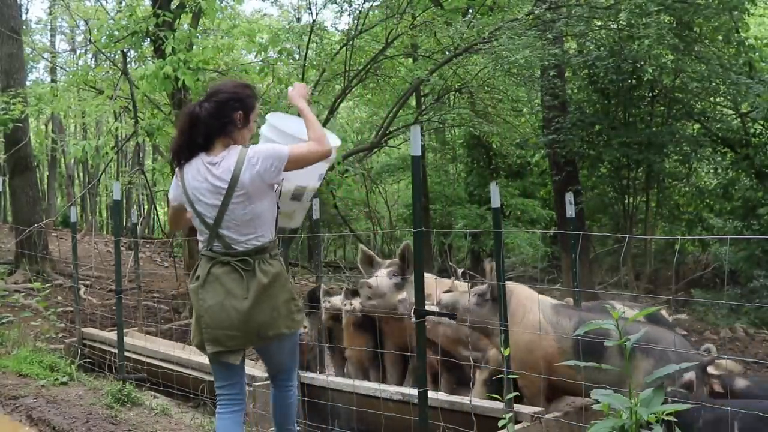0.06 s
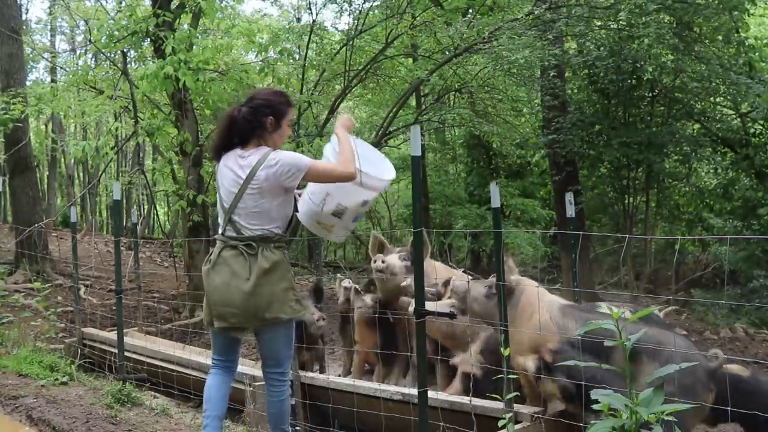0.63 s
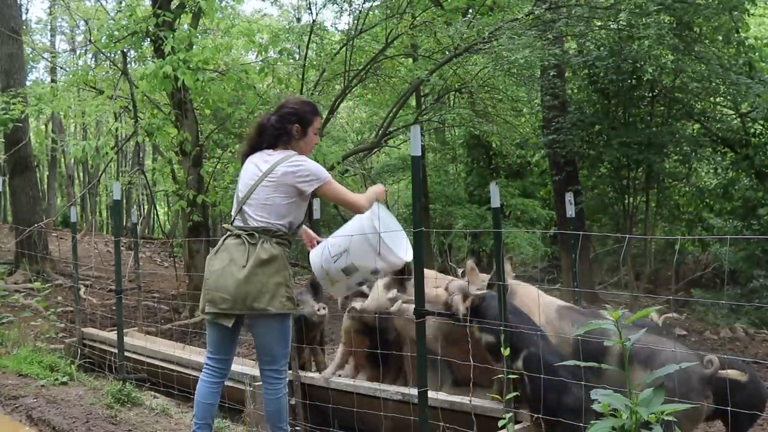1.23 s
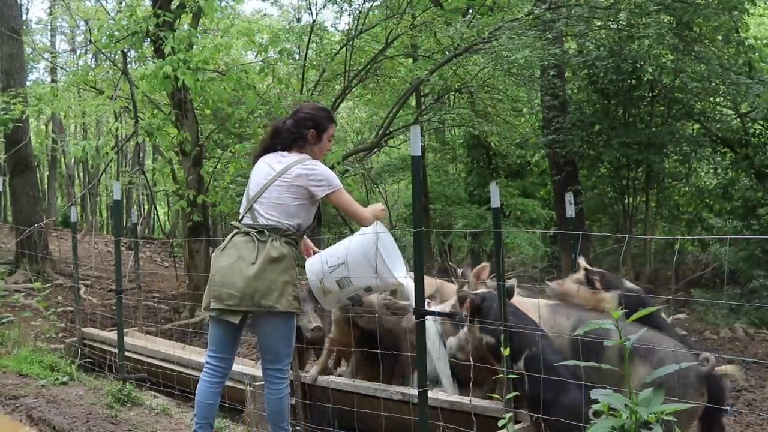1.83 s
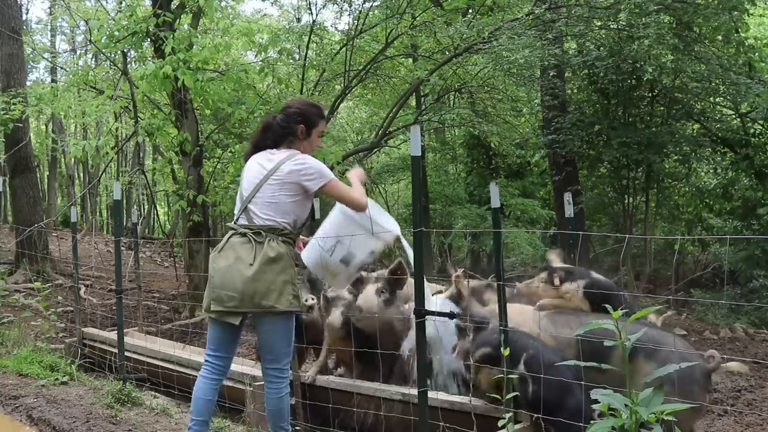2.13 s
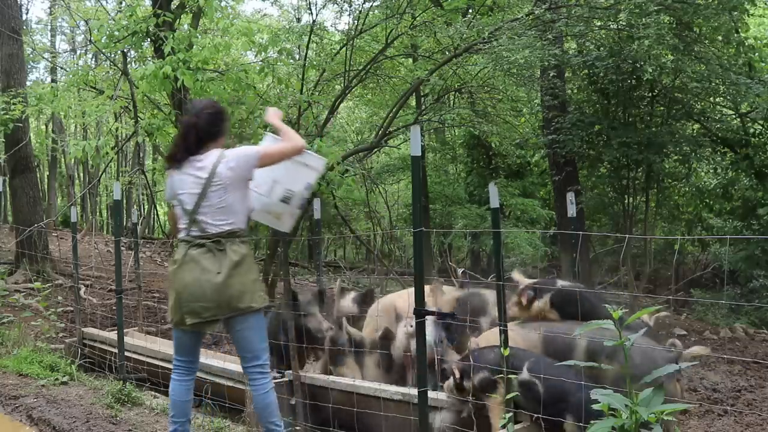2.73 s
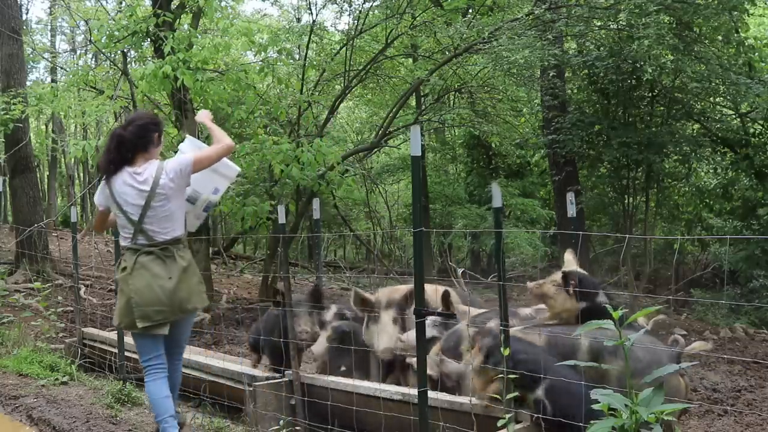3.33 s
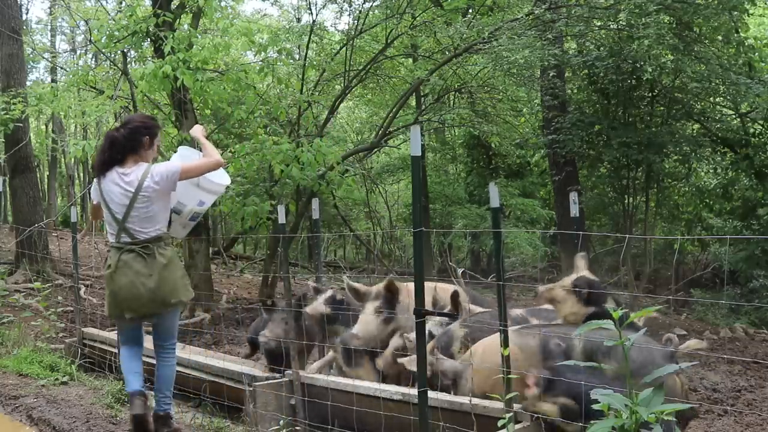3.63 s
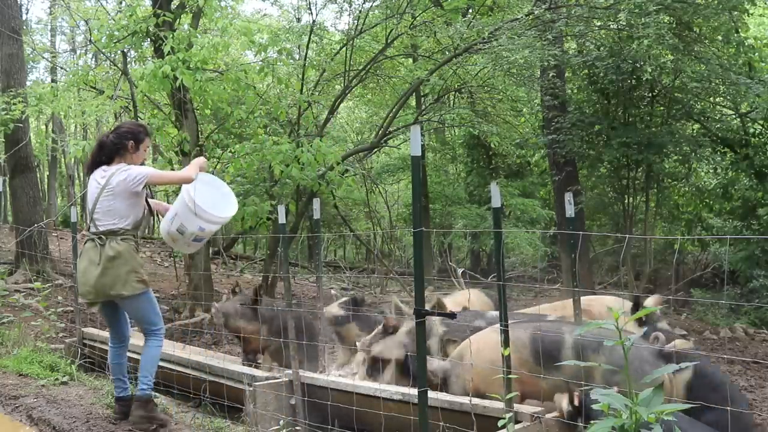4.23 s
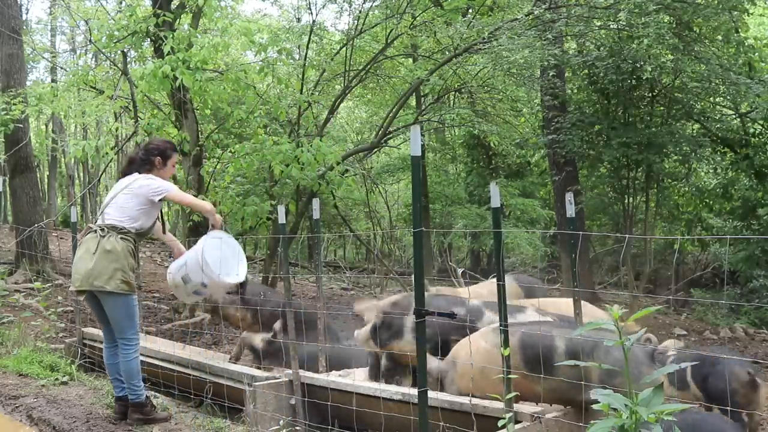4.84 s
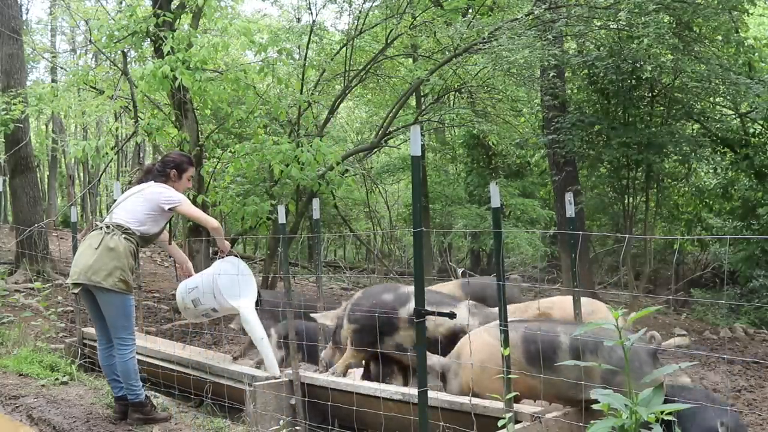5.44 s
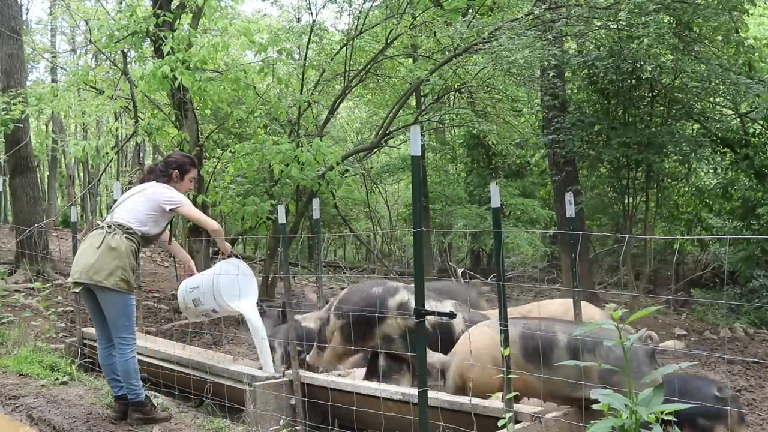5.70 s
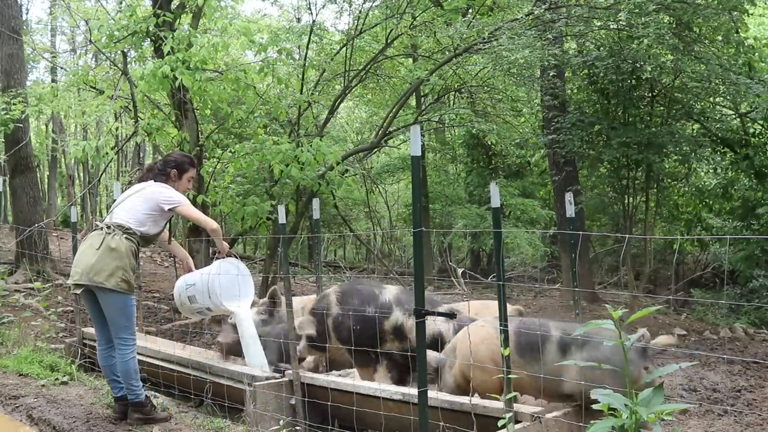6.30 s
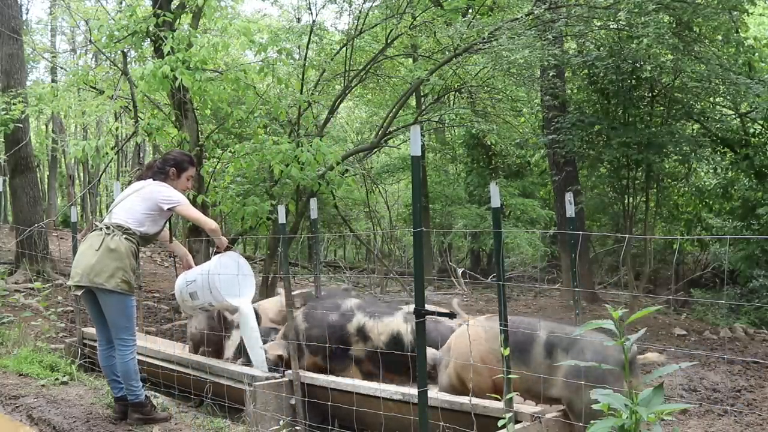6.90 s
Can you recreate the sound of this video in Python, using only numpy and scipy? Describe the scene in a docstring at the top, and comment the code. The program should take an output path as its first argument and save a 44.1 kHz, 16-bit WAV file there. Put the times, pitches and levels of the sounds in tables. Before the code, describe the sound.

Several pigs give short, rattling grunts a few metres from the microphone at the edge of a wood. Snouts and hooves thud on a wooden trough and wet mouths smack. About three seconds in, one pig lets out three quick, shrill squeals, followed by a single bark. Behind them, liquid feed splashes into the trough in spells over the low shuffle of the herd. The loudest knock comes near the end.

```python
"""Pigs grunting at a wooden feed trough, a few metres from one microphone at the edge of a wood.
Each grunt is a rattle of throat flaps over a chest growl; one pig squeals from its larynx, one barks.
Snouts and hooves thud on the boards, wet mouths smack, and the trees return a thin tail.
Behind them liquid feed splashes into the trough in spells, over the trampling of the herd."""
import sys
import numpy as np
from scipy import signal
from scipy.io import wavfile

SR = 44100
rng = np.random.default_rng(int(sys.argv[2]) if len(sys.argv) > 2 else 0)


def unload_audio(sound):
    """Save the sound as a 16-bit wav file, at the path given as the first command line argument."""
    columns = np.transpose(np.atleast_2d(sound))
    # keep every value between -1 and 1, then stretch to whole-number steps
    steps = np.round(np.clip(columns, -1, 1) * 32767)
    wavfile.write(sys.argv[1], SR, steps.astype(np.int16))


N = 311346

# grunts, plus one brief rasping chirp at 2.005 s made the same way: t/s, length/s, flap rate/Hz, rattle
# level/dB, chest level/dB, throat
GRUNTS = [ (0.376, 0.091, 61.4, -32, -28, "deep"), (0.765, 0.05, 72, -36.5, -41, "hoarse"),
          (0.9712, 0.094, 62.4, -29, -27.5, "rattling"), (1.5135, 0.084, 63.4, -28, -38.5, "hollow"),
          (2.005, 0.045, 82, -29.5, -52, "hoarse"), (2.632, 0.11, 58, -30.5, -31, "rattling"),
          (2.728, 0.062, 84, -29.5, -33, "hoarse"), (2.962, 0.051, 76, -30.5, -42, "hoarse"),
          (3.008, 0.029, 127, -25.5, -39, "hoarse"), (4.081, 0.119, 45.2, -24.5, -31.5, "nasal"),
          (4.630, 0.11, 79.7, -29, -24, "deep"), (4.969, 0.075, 44, -29, -32.5, "nasal"),
          (6.066, 0.034, 53, -22.5, -41, "shrill"), (6.324, 0.14, 45, -32.5, -30, "deep"), ]
# resonances of each throat: f/Hz, width/Hz, gain/dB
THROAT_MODES = { "rattling": [(593, 48, 7.5), (1530, 143, 6), (2820, 230, 3.5), (3820, 480, -9),
                (4520, 130, -5), (5440, 120, 7.5)], "deep": [(363, 120, -2.5), (695, 200, 2.5),
                (1516, 170, 4.5), (2700, 640, -5.5), (3640, 410, -5), (5500, 1200, -15)],
                "nasal": [(540, 130, -7), (1230, 160, 0.5), (1423, 68, 8.5), (2250, 140, -4),
                (4600, 750, -26)], "hollow": [(327, 29, 13), (736, 127, 4), (1890, 100, 1),
                (3100, 360, -10), (6000, 650, -17.5)], "shrill": [(1400, 64, -2.5), (1747, 73, 0.5),
                (3070, 94, 3), (3770, 300, -11.5), (5070, 280, -12)], "hoarse": [(320, 95, 4),
                (840, 140, 1.5), (1410, 220, -3), (2003, 154, 4), (3480, 280, 0.5), (5750, 620, -9.5)], }
# use of each throat: breathiness, treble tilt at normal effort/(dB per decade), crest/share of length
THROAT_MANNERS = {"rattling": (0.2, 4.8, 0.12), "deep": (0.42, 3.7, .05), "nasal": (0.14, -8, 0.56),
                  "hollow": (0.31, -1, 0.62), "shrill": (.8, -13, 0.19), "hoarse": (1, 3, 0.46)}
# chest resonances: f/Hz, width/Hz, gain/dB
CHEST_MODES = [(105, 66, -1.5), (195, 104, -0.5), (275, 106, -1), (414, 89, -14.5), (584, 42, -12)]
# cries of the squeal: t/s, length/s, attack/s, level/dB, first f/Hz, last f/Hz, last roughness (0-1)
CRIES = [(3.094, 0.0705, 0.03, -15, 2764, 2560, 0.27), (3.192, .097, 0.039, -15.5, 2240, 1990, 0.4),
         (3.289, .049, 0.004, -18, 2500, 1770, 0.6)]
# rasp bands that glide with the whistle: multiple of its pitch, width/Hz, gain/dB
SQUEAL_BANDS = [(.8, 260, -3), (1.0, 380, 2), (1.18, 378, -2), (2.22, 418, -12.5)]
# resonances of the squealing mouth: f/Hz, width/Hz, relative gain/dB
SQUEAL_MOUTH = [(5200, 180, -10.5), (5830, 220, -10.5), (6470, 200, -12.5), (8000, 370, -28),
                (10300, 590, -26), (13900, 1400, -32)]
# resonances of the barking throat: f/Hz, width/Hz, gain/dB
BARK_THROAT = [(583, 210, 2), (1100, 175, 8), (1650, 320, 3), (2340, 360, 0), (3040, 1450, -9.5)]
# blows on the trough: t/s, peak level/dB, main ring f/Hz, low-pass f/Hz
THUDS = [(0.261, -22, 170, 1200), (0.812, -14.5, 292, 910), (0.947, -21.5, 193, 400),
         (1.175, -21.5, 270, 400), (2.238, -12.5, 272, 620), (2.337, -12, 320, 1030),
         (2.468, -14.5, 340, 560), (2.517, -13, 255, 500), (2.779, -4.5, 425, 597), (2.800, -15, 446, 500),
         (3.083, -9, 340, 700), (3.256, -9.5, 263, 524), (3.559, -16, 378, 910), (3.726, -15, 338, 500),
         (4.263, -17, 370, 900), (4.287, -15, 205, 420), (5.153, -13, 187, 380), (5.318, -13.5, 310, 1290),
         (5.884, -15.5, 221, 400), (6.167, -11, 216, 363), (6.6955, -5, 224, 507), (6.8222, -2, 399, 2900)]
# modes of the boards: multiple of the main ring, gain/dB
BOARD_MODES = [(.62, -2), (1.0, 3), (1.45, -6.5), (2.1, -8), (3.1, -11), (4.2, -17)]
# smacks of mouths and mud: t/s, peak level/dB, f/Hz, nominal width/Hz
SMACKS = [(0.260, -20.5, 1130, 217), (0.320, -23, 2040, 300), (0.622, -17.5, 3900, 4500),
          (1.144, -25, 1100, 300), (1.779, -13.5, 3060, 694), (2.485, -25.5, 7800, 6030),
          (2.512, -18.5, 3220, 2500), (3.559, -15, 2470, 4830), (4.451, -21, 5400, 6000),
          (4.513, -22.5, 2800, 2980), (4.644, -24.5, 7900, 6000), (4.862, -25, 2200, 4000),
          (5.714, -13, 2040, 1210), (5.763, -18.5, 1290, 350), (6.892, -15, 4870, 2200)]
# feed poured in or churned by snouts: start t/s, end t/s, relative level/dB
SPLASHES = [(.3, .74, -40), (1.67, 2.29, -34.5), (2.41, 2.684, -38), (3.242, 3.518, -35.5),
            (5.16, 5.733, -35.5), (5.8, 7.06, -36)]
# spectrum of sloshing feed: f/Hz, relative level/dB
SLOP_SPECTRUM = [(450, -3), (800, 1.5), (1250, 9.5), (2000, -2), (2900, -5)]
# spectrum of its fine spray: f/Hz, relative level/dB
SPRAY_SPECTRUM = [(1700, -4.5), (2700, 3), (3600, 1), (4700, 0), (5900, 0.5), (7400, -10), (10500, -10),
                  (15500, -15)]
# hollow ring of the trough under the feed: f/Hz, width/Hz, relative gain/dB
TROUGH_MODES = [(1420, 210, -12), (2450, 230, -9), (3730, 330, 3)]
# low background (herd shuffle, plus the squeal's low hum near 3.15 s): t/s, relative level/dB
BACKGROUND_LEVEL = [(0.0, -42), (0.33, -40.5), (0.75, -46), (1.0, -40.5), (1.38, -45), (2.08, -47),
                    (2.28, -37.5), (3.03, -42.5), (3.15, -33), (3.56, -37.5), (4.13, -32.5), (4.44, -37.5),
                    (4.88, -36.5), (5.21, -42.5), (5.64, -42.5), (6.29, -34), (6.57, -37.5), (7.06, -30.5)]
# spectrum of far grunts and trampling: f/Hz, relative level/dB
HERD_SPECTRUM = [(25, -19), (45, -12.5), (80, -8.5), (130, -1.5), (300, 2), (480, -7), (750, -9.5),
                 (1200, -19)]

NORMAL_EFFORT_DB, TILT_PER_DB = -29, 1.4   # louder is brighter: dB per decade for each dB of rattle
SQUEAL_PULSE_HZ, CRY_FIRST_ROUGHNESS = 380, 0.88
RASP_LOSS_DB = 9.5   # a full rasp against a clean whistle
BARK_START_S, BARK_DB, BARK_PITCH_HZ, BARK_SAG_HZ_PER_S = 3.9415, -12.5, 580.6, 2200
MUD_DB, MUD_FOLLOWS = -26.5, 0.35   # mud underfoot takes this share of the background's swing in dB
TREES_T60_S, TREES_DB = 0.3, -21


def grunt(length, flap_hz, rattle_db, chest_db, throat):
    """The throat flaps open in wet puffs; under it the folds growl at about twice that rate, sinking."""
    breath, tilt, crest = THROAT_MANNERS[throat]
    tilt = tilt + TILT_PER_DB * (rattle_db - NORMAL_EFFORT_DB)
    t = clock(length * 1.14 + 0.024)
    progress = t / length
    flaps = pulses(flap_hz * (1 + .01 * drift(60, t)))
    air = noise(t) * (puffs(flaps, seconds=.0022) + breath * .5) + 6 * flaps
    air = air * swell(progress, crest, edge=0.58) ** 2
    modes = [(hz, width, db + tilt * np.log10(hz / 1000)) for hz, width, db in THROAT_MODES[throat]]
    rattle = cut(resonate(air, modes), 11400, "low")
    slack = np.clip((progress - .4) * 2, 0, 1)   # as the pressure drops the flaps lose their edge
    rattle = (1 - slack) * rattle + slack * cut(rattle, 5400, "low")
    beats = pulses(2 * flap_hz * (1.04 - 0.202 * progress + 0.037 * drift(95, t)))
    uneven = 1 + 0.77 * (-1) ** np.cumsum(beats) + 0.51 * drift(148, t)   # strong and weak in turn
    growl = (beats * uneven + .03 * noise(t)) * swell(progress, crest=.55, edge=.5)
    chest = cut(resonate(growl, CHEST_MODES), 72, "high", order=4)
    chest = cut(chest, 1000, "low")
    tail_makeup = np.sqrt(len(t) / (length * SR))
    return tail_makeup * (from_db(rattle_db) * rms_one(rattle) + from_db(chest_db) * rms_one(chest))


def squeal(length, attack, level_db, first_hz, last_hz, last_rough):
    """One cry from the larynx: a pulsed rasp sinks and clears towards a whistle; the mouth flutters."""
    t = clock(length + 0.043)
    progress = np.minimum(t / length, 1)
    hz = first_hz + (last_hz - first_hz) * progress
    rough = np.clip(CRY_FIRST_ROUGHNESS + (last_rough - CRY_FIRST_ROUGHNESS) * progress ** 2, 0, 1)
    phase = 2 * np.pi * np.cumsum(hz * (1 + .05 * rough * drift(600, t))) / SR
    beats = pulses(SQUEAL_PULSE_HZ * (1 + .035 * drift(150, t)))
    gate = puffs(beats, seconds=0.0019)
    air = beats * (1 + .35 * drift(300, t)) + .1 * noise(t) * (gate + .1)
    rasp = 0
    for multiple, width, db in SQUEAL_BANDS:
        carrier, r = np.exp(1j * multiple * phase), np.exp(-np.pi * width / SR)
        band = carrier * signal.lfilter([1], [1, -2 * r, r * r], air / carrier)   # rides on the pitch
        rasp = rasp + from_db(db) * (1 - r) ** 2 * band.real
    mouth = sum(resonate(air, [mode]) * from_db(3 * drift(70, t)) for mode in SQUEAL_MOUTH)
    rasp = cut(rasp, 1600, "high") + 0.43 * cut(mouth, 13000, "low")
    whistle = rms_one(np.sin(phase) * (1 + cut(gate, 1100, "low")))
    hum = from_db(-12) * rms_one(resonate(beats, [(SQUEAL_PULSE_HZ, 160, 0)]))
    clean = 1 - rough ** 2
    voice = np.sqrt(1 - clean ** 2) * rms_one(rasp) + clean * whistle + rough * hum
    effort = from_db(level_db - RASP_LOSS_DB * (rough - .5))
    return effort * envelope(t, attack, hold=length - attack, release=0.0083) * voice


def bark():
    """A few hard, high pulses through an open mouth."""
    t = clock(.06)
    hz = BARK_PITCH_HZ - BARK_SAG_HZ_PER_S * t
    air = pulses(hz * (1 + 0.024 * drift(400, t))) + 0.17 * noise(t)
    effort = from_db(BARK_DB) * envelope(t, attack=0.0062, hold=0.0072, release=0.0074)
    return effort * rms_one(cut(resonate(air, BARK_THROAT), 6800, "low"))


def thud(peak_db, ring_hz, cutoff_hz):
    """A padded blow and its short scuff ring the damp boards; softer blows lose the upper modes."""
    t = clock(.2)
    decay_scale = 0.041 - .001 * peak_db   # a heavy blow presses on the boards; light ones ring longer
    push = 0.11 * noise(t) * np.exp(-t / (decay_scale * 0.18))
    push[0] += 1.9   # the blow itself
    width_hz = 1.93 * 1.38 / decay_scale
    modes = [(ring_hz * multiple, width_hz * multiple, db) for multiple, db in BOARD_MODES]
    boards = cut(resonate(push, modes), cutoff_hz, "low", order=3)
    return from_db(peak_db) * boards / np.abs(boards).max()


def smack(peak_db, hz, width, rise_s=0.0088 * 0.39):
    """A wet film bursts and rings the hollow behind it."""
    t = clock(.08)
    burst = noise(t) * t * np.exp(-t / rise_s)
    hollow = [(hz, 1.2 * width, 0)]
    pop = resonate(resonate(burst, hollow), hollow)
    return from_db(peak_db) * pop / np.abs(pop).max()


def feed(t, background_db):
    """Liquid feed and trodden mud slosh and spray, ringing the hollow trough."""
    power = from_db(MUD_DB + MUD_FOLLOWS * background_db) ** 2
    rise_s = 0.18
    for start, end, db in SPLASHES:
        splash = from_db(db) * envelope(t - start, rise_s, hold=end - start - rise_s, release=0.13)
        power = power + splash ** 2
    wet_db = 10 * np.log10(power)
    slop_db = (background_db + wet_db) / 2   # sloshing swells with both the background and the feed
    slop = patter(SLOP_SPECTRUM, per_s=200, spread_db=3.0, bed=0.95, flicker_db=5.0)
    spray = patter(SPRAY_SPECTRUM, per_s=600, spread_db=3.5, bed=1.34, flicker_db=3.0)
    wet = from_db(slop_db - 1.0) * slop + from_db(wet_db - 1.28) * spray
    ring = sum(resonate(wet, [mode]) for mode in TROUGH_MODES)
    return 1.05 * wet + 0.38 * ring


def herd(background_db):
    """Far grunts and trampling blur into a low shuffle; it also swells briefly under the squeal."""
    shuffle = patter(HERD_SPECTRUM, per_s=70, spread_db=2.5, bed=0.5, flicker_db=2.5)
    return from_db(background_db + 2.55) * shuffle


def trees(x):
    """Trunks and leaves scatter a thin, dull tail back to the microphone."""
    t = clock(.5)
    scatter = noise(t) * from_db(-60 * t / TREES_T60_S) * (t > .006)
    tail = cut(scatter, 5300, "low")
    return signal.fftconvolve(x, tail / np.linalg.norm(tail))[:N]


def patter(spectrum, per_s, spread_db, bed, flicker_db):
    """Small grains on a bed of smooth noise, in third-octave bands that flicker apart; rms 1."""
    t = np.arange(N) / SR
    hz, db = np.transpose(spectrum)
    edges = 20 * 2 ** (np.arange(30) / 3)
    shared_flicker = from_db(flicker_db * 0.58 * drift(25, t))
    sources = []
    for _ in range(3):
        hits = rng.random(N) < per_s / SR
        sizes = from_db(spread_db * np.minimum(rng.exponential(1, N), 4))
        grains = hits * sizes * rng.choice([-1, 1], N)
        sources.append(rms_one(grains) + bed * rng.standard_normal(N))
    out, coarse_t = np.zeros(N), t[::64]
    for k, (low, high) in enumerate(zip(edges, edges[1:])):
        centre = np.sqrt(low * high)
        wander_db = flicker_db * drift(40, coarse_t)
        if hz[0] < centre < hz[-1]:
            gain = from_db(np.interp(np.log(centre), np.log(hz), db) + wander_db)
            out += np.interp(t, coarse_t, gain) * cut(sources[k % 3], [low, high], "band")
    return rms_one(out * shared_flicker)


def resonate(x, modes):
    """Parallel resonances (f/Hz, width/Hz, gain/dB) with alternating signs."""
    out = 0
    for k, (hz, width, db) in enumerate(modes):
        r = np.exp(-np.pi * width / SR)
        poles = [1, -2 * r * np.cos(2 * np.pi * hz / SR), r * r]
        ring = signal.lfilter([1, 0, -1], poles, x + 1e-18)
        out = out + (-1) ** k * from_db(db) * (1 - r * r) / 2 * ring
    return out


def pulses(hz):
    """One unit click per cycle."""
    return np.diff(np.floor(np.cumsum(hz) / SR), prepend=-1)


def puffs(clicks, seconds):
    """Each click opens a gate that closes exponentially."""
    return signal.lfilter([1], [1, -np.exp(-1 / (seconds * SR))], clicks)


def swell(progress, crest, edge):
    """Effort through a call: up from edge to 1 at the crest, down again, then shut."""
    return np.interp(progress, [0, np.clip(crest, .02, .9), 1, 1.1], [edge, 1, edge, 0])


def envelope(t, attack, hold, release):
    """A straight rise, a hold and an exponential fall, in seconds."""
    return np.clip(t / attack, 0, 1) * np.exp(-np.maximum(t - attack - hold, 0) / release)


def noise(t):
    """White noise for a sound of up to half a second."""
    return rng.standard_normal(SR // 2)[:len(t)]


def drift(rate, t):
    """Random wander of spread about 1, turning rate times a second."""
    return np.interp(t * rate, np.arange(4096), rng.standard_normal(4096))


def cut(x, hz, kind, order=2):
    """Butterworth filter."""
    return signal.sosfilt(signal.butter(order, hz, kind, fs=SR, output="sos"), x)


def from_db(db):
    """Decibels to gain."""
    return 10 ** (np.asarray(db) / 20)


def rms_one(x):
    """Scale to rms 1."""
    return x / np.sqrt(np.mean(x ** 2) + 1e-20)


def clock(seconds):
    """Sample times of a short sound."""
    return np.arange(int(seconds * SR)) / SR


def add(track, start_s, sound):
    """Mix a sound into the track."""
    i = int(start_s * SR)
    track[i:i + len(sound)] += sound[:N - i]


def scene():
    """The pigs a few metres off among trees, with feed and herd behind them; mono."""
    pigs = np.zeros(N)
    for table, source in ((GRUNTS, grunt), (THUDS, thud), (SMACKS, smack), (CRIES, squeal)):
        for start_s, *row in table:
            add(pigs, start_s, source(*row))
    add(pigs, BARK_START_S, bark())
    t = np.arange(N) / SR
    background_db = np.interp(t, *np.transpose(BACKGROUND_LEVEL))
    return (pigs + from_db(TREES_DB) * trees(pigs) + herd(background_db) + feed(t, background_db))[None]


def record(dry):
    """The microphone signal is clipped at full scale and cut steeply above 15750 Hz."""
    low_pass = signal.ellip(10, .1, 80, 15750, fs=SR, output="sos")
    return signal.sosfilt(low_pass, np.clip(dry, -1, 1))


dry = scene()
out = record(dry)
unload_audio(out)
```